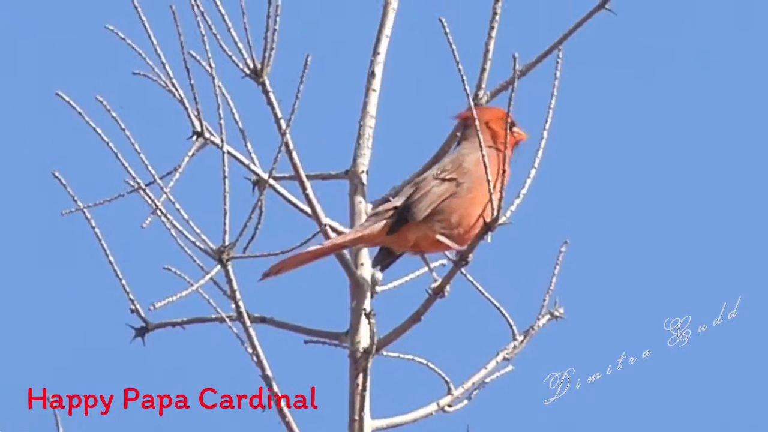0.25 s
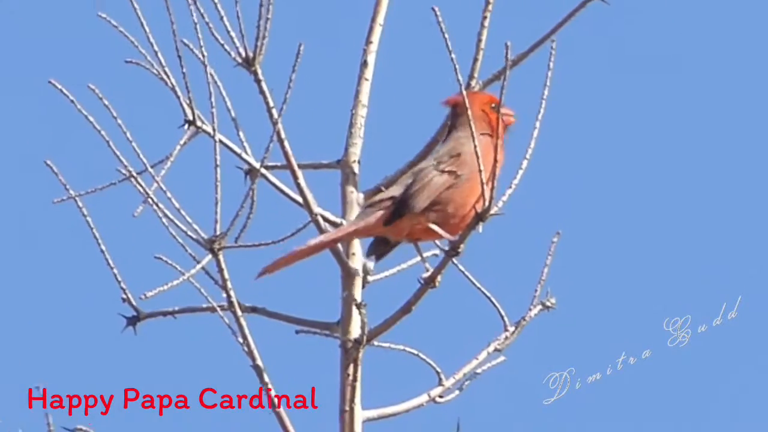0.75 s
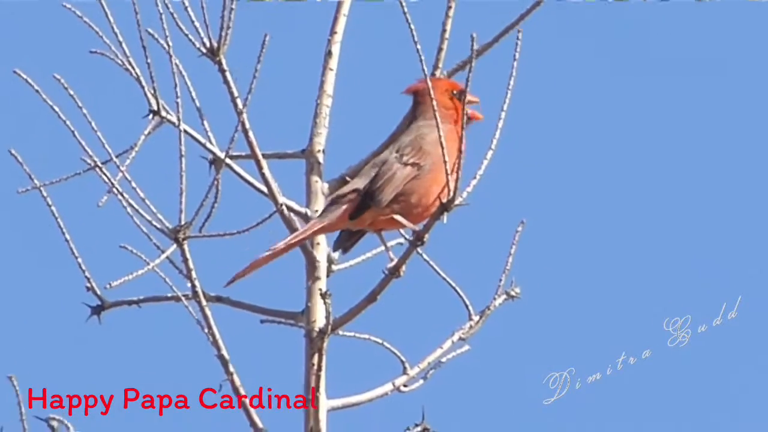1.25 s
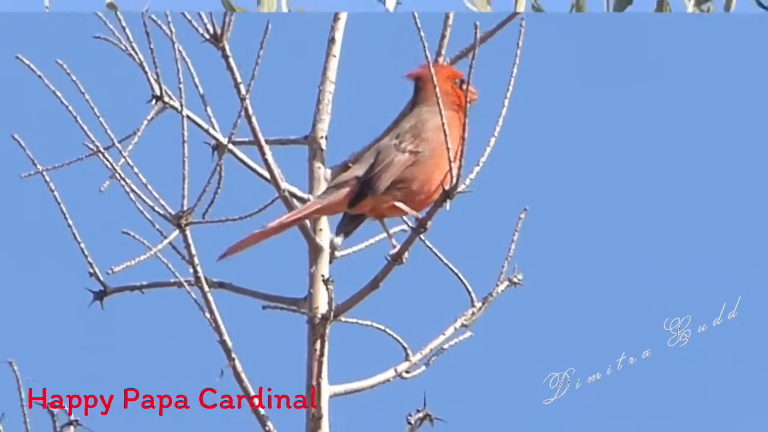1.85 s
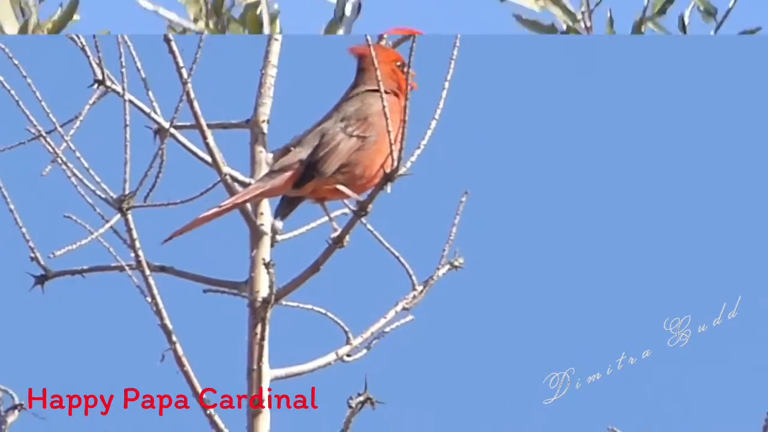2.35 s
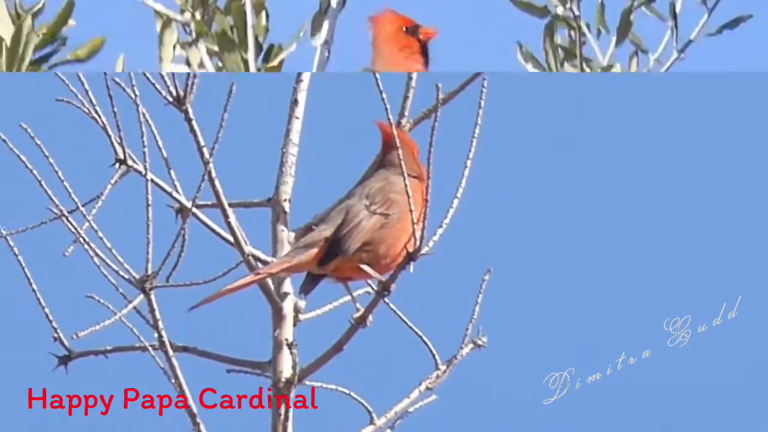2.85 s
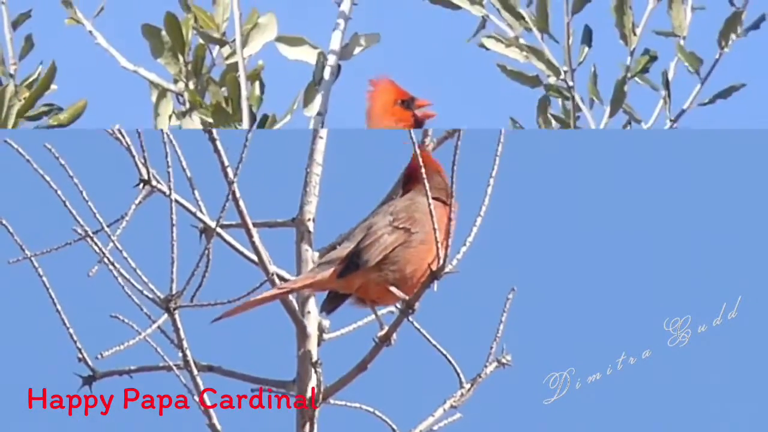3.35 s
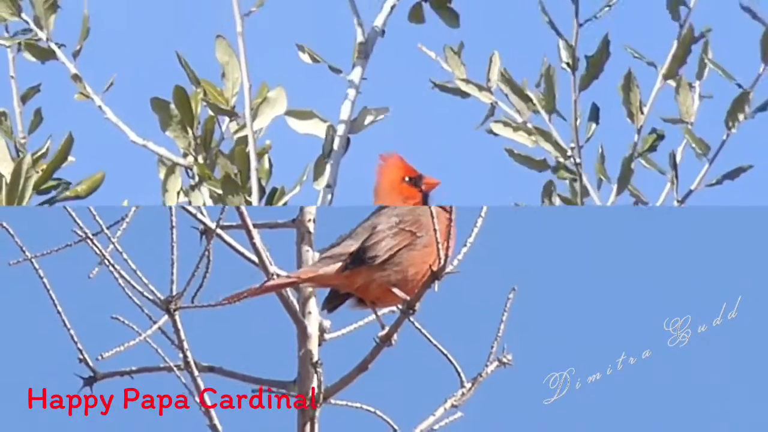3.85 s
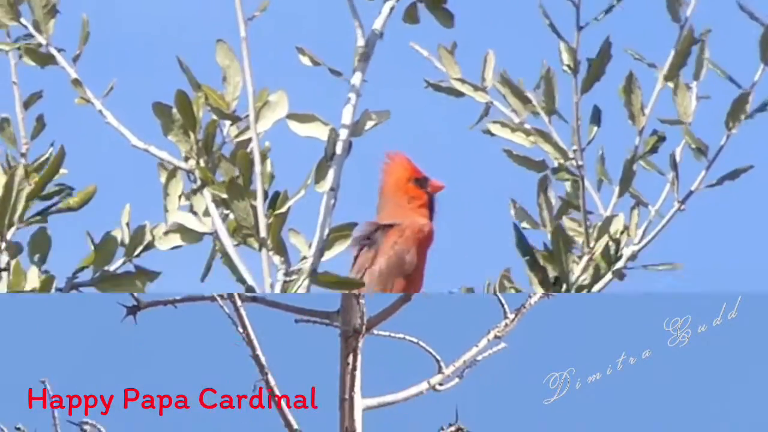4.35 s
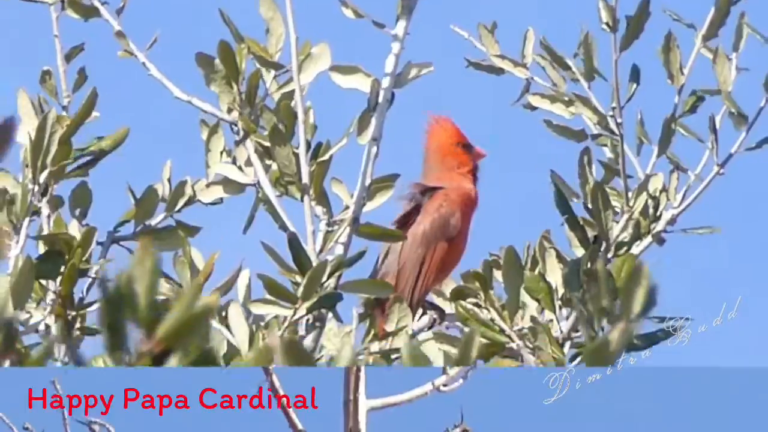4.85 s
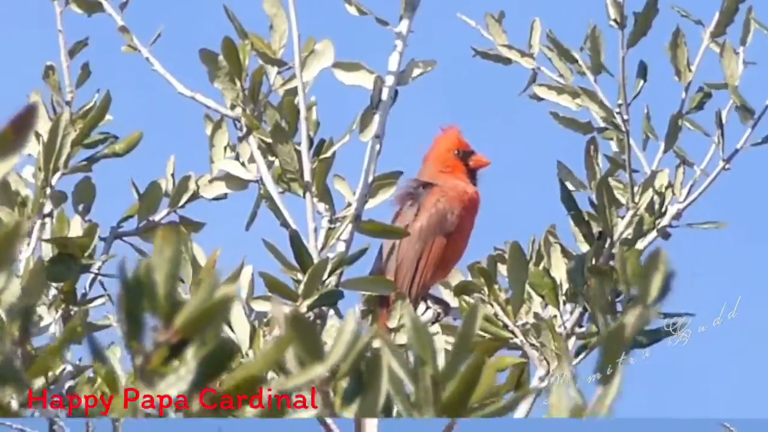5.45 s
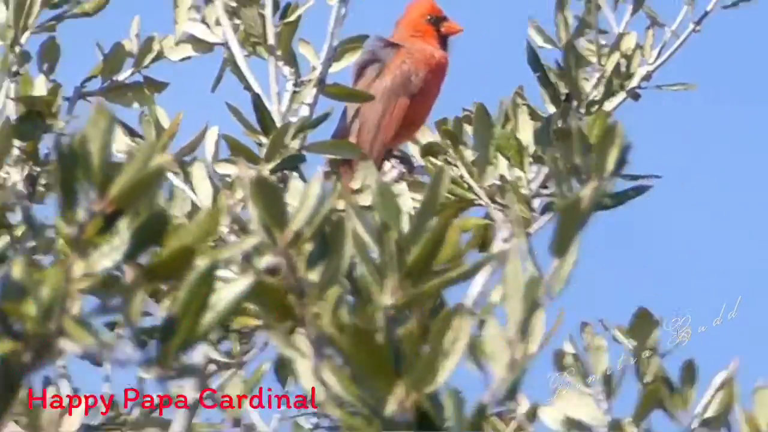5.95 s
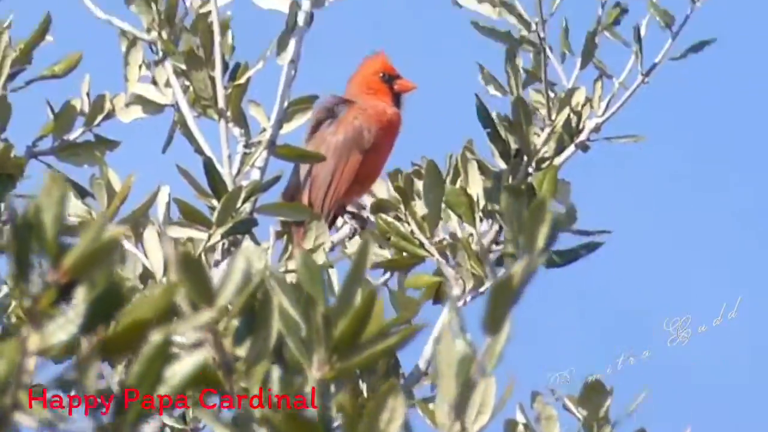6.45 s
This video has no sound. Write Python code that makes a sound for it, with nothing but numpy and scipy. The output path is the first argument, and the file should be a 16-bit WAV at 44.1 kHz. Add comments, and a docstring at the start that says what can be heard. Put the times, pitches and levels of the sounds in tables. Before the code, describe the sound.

Clear falling bird whistles lead into a rapid upward-sweeping trill, overlapped by another cardinal's quick downward slashes, with wind buffeting the microphone.

```python
"""A cardinal trills outdoors: long falling whistles, then a run of rising whips, all nearly pure swept tones.
A second cardinal overlaps it, alternating a soft low note with a quick downward slash as its song sinks from a
high register to a low one. Trees scatter both songs as sprays of echoes. Gusts, made of rumbling noise and single
thumps, buffet the microphone, mostly on the right; behind lie a murmur of coloured noise and a fading drone."""
import sys
import numpy as np
from scipy import signal
from scipy.fft import rfft, irfft
from scipy.io import wavfile
from scipy.ndimage import uniform_filter1d, map_coordinates

SR = 44100
rng = np.random.default_rng(int(sys.argv[2]) if len(sys.argv) > 2 else 0)


def wav_record(signal):
    """Record a signal, one row per channel, as 16-bit PCM in the file named by sys.argv[1]."""
    frames = np.transpose(np.atleast_2d(signal))
    bounded = np.clip(frames, -1, 1)
    # unit amplitude maps onto the largest positive 16-bit level
    quanta = np.round(bounded * 32767).astype(np.int16)
    wavfile.write(sys.argv[1], SR, quanta)


N = 295470
TIME = np.arange(N) / SR

# falling whistles: (start [s], length [s], start pitch [Hz], end pitch [Hz], level [dB])
FALLING_WHISTLES = [(-.13, 0.2, 3910, 2814, -35.5), (0.214, .14, 1967, 1868, -46),
                    (0.419, .112, 8950, 4910, -34), (0.553, .215, 4065, 2814, -31)]
# shape of a falling whistle: (share of its length, share of its fall still to come, level [dB])
FALLING_WHISTLE_SHAPE = [(0, 1, -18), (.055, .93, -2), (.19, .71, -5), (.48, .44, 0.5), (.71, .12, -2.5),
                         (.86, 0.0074, -4), (1, .03, -5.5)]
# onsets of the rising whips: (time [s])
WHIP_ONSETS = [0.845, .956, 1.067, 1.183, 1.297, 1.41, 1.524, 1.638, 1.752, 1.864, 1.974, 2.088, 2.203,
               2.314, 2.431, 2.546, 2.659]
# shape of a rising whip: (share of its length, pitch [Hz], level [dB])
WHIP_SHAPE = [(0, 1880, -23.5), (.14, 2180, -20), (.334, 2784, -8), (.55, 3560, -6.5), (.79, 4330, -5),
              (.9, 4900, -14.5), (1, 5870, -29)]
# syllables of the second song, each a low note and then a slash: (time of the slash [s], level of the slash [dB])
SYLLABLES = [(1.54, -51), (1.74, -47.5), (1.936, -49), (2.135, -45.5), (2.327, -41), (2.521, -45),
             (2.712, -49), (2.897, -44.5), (3.089, -40.5), (3.276, -40), (3.472, -36), (3.68, -36),
             (3.891, -34.5), (4.122, -36.5), (4.354, -35.5), (4.59, -36), (4.823, -36.5)]
# loudness through a low note: (share of its length, level [dB])
LOW_NOTE_SWELL = [(0, -23), (.24, -8), (.46, -10.5), (.64, 2.5), (.85, -1.5), (1, -14)]
# loudness through a slash: (share of its length, level [dB])
SLASH_SWELL = [(0, -9.5), (.14, -8), (.3, -6), (.45, -4.5), (.7, -3), (.85, -8.5), (1, -21)]
# overtones that leak past the throat: (multiple of the pitch, level [dB]);
# the first row stands for the fundamental, whose level is not read
WHISTLE_TONES = [(1, -1), (2, -24.5), (3, -24), (4, -28)]
WHIP_TONES = [(1, 0), (2, -28.5), (3, -34)]
LOW_NOTE_TONES = [(1, 0), (2, -27), (3, -24), (4, -16)]
SLASH_TONES = [(1, 0), (2, -21), (3, -24)]
# how much of the overtones the throat and open beak let out: (frequency [Hz], level [dB])
THROAT = [(3000, -8), (5800, -10), (7400, -3.5), (8500, -1), (10000, -7.5), (11500, -14), (13000, 1),
          (15000, -25)]
# gusts on the microphone: (start [s], length [s], level before it sags [dB])
GUSTS = [(1.183, 0.35, -33), (1.842, 0.25, -29), (2.398, 0.18, -26), (2.744, 0.056, -30.5),
         (3.35, 0.31, -31.5), (4.07, 0.082, -39), (4.32, 0.61, -35.5), (5.338, 0.017, -39),
         (5.446, 0.023, -45)]
# eddies that thump the right port: (time of the middle [s], pitch [Hz], level [dB])
THUMPS = [(1.1697, 169, -21), (1.372, 187, -18), (1.3817, 302, -8.5), (1.4003, 338, -17.5),
          (2.118, 171, -18), (2.399, 300, -15.5), (2.419, 907, -27), (2.4548, 470, -16.5),
          (3.609, 245, -21.5), (4.094, 333, -21.5), (4.152, 290, -21.5), (4.542, 273, -21),
          (4.746, 250, -17.5), (4.767, 344, -20)]
# noise colours, relative within each table: (frequency [Hz], level per Hz [dB])
WIND_COLOUR = [(30, -43), (50, -39), (75, -12.5), (110, -2.5), (160, 0), (240, -1), (350, -12),
               (500, -21.5), (800, -48), (1600, -51), (4000, -66)]
MURMUR_COLOUR = [(30, -34), (55, -22), (90, -4), (140, 1.5), (220, -2), (450, -7), (800, -8), (1750, -18),
                 (2450, -27.5), (3500, -26), (5600, -34.5), (8500, -34.5), (13000, -37), (15000, -44)]
DRONE_COLOUR = [(40, -42), (100, -8.5), (150, -1.5), (195, -7.5), (255, 2), (315, -8), (365, -2),
                (440, -11), (700, -13), (1400, -19.5), (2500, -29.5), (7000, -30.5), (10000, -35.5),
                (15000, -53)]
# likeness of distant sound at the two ports: (frequency [Hz], correlation)
PORT_LIKENESS = [(60, 0.97), (290, 0.99), (640, 0.54), (900, 0.43), (1300, -0.33), (2000, 0.041),
                 (3100, 0.093), (7000, 0.23), (15000, 0.56)]

# First song
STRAIN_HZ, STRAIN_DB_PER_OCTAVE = 5980, 23  # above this pitch the whistling voice weakens
WHIP_LENGTH_S, WHIP_LENGTH_SCATTER = .057, 0.0203  # the scatter is a share of the length
# the trill swells quickly to its peak, then tires slowly
TRILL_PEAK_S, TRILL_DB, TRILL_SWELL_DB_PER_S, TRILL_FADE_DB_PER_S = 1.118, -23, 23.5, 3.5
WHIP_TOP_HZ, WHIP_REACH_HZ_PER_DB = 5930, 180  # weaker whips stop at a lower pitch

# Second song; pairs are (high register, low register) unless noted
SINK_S, SINK_WIDTH_S = 2.77, .42  # the song sinks smoothly from its high register to its low one
LAST_NOTE_S = 4.94  # the song breaks off after one more low note
LOW_NOTE_FOOT_HZ, LOW_NOTE_CREST_HZ = (1808, 1493), (2880, 1830)
LOW_NOTE_CREST_AT = (0.522, .92)  # share of the note's length
LOW_NOTE_LEAD_S = (.127, .116)  # how far the low note starts before its slash
LOW_NOTE_LENGTH_S, LOW_NOTE_CREEP_HZ = .068, 331
LOW_NOTE_ARCH, LOW_NOTE_FLIP_AT = .7, .5  # curvature of the arch; share of the length where the tone flips
# the low notes swell to a peak and fade through the song
LOW_NOTE_PEAK_S, LOW_NOTE_DB, LOW_NOTE_SWELL_DB_PER_S, LOW_NOTE_FADE_DB_PER_S = 2.03, -42.5, 14, 2.5
SLASH_START_HZ, SHOULDER_HZ = 8580, (6950, 4170)
OFF_TUNE_DB_PER_OCTAVE = (-14, 24.5)  # loss at the onset; a negative loss is a boost
SLASH_DROP_S = (.0046, .003)  # time constant of the drop onto the shoulder
SLASH_BRIGHT_DB = (10, -5)  # lift of the overtones
# early slashes only sag from the shoulder; around SLIDE_FROM_S they turn to sliding all the way down
SLIDE_FROM_S, SLIDE_WIDTH_S, SLASH_SAG_HZ, SLASH_END_HZ = 2.78, .045, 402, 2185
SLASH_LENGTH_S = (.035, .048)  # (sagging, sliding)

# Wind, murmur and recorder
GUST_ATTACK_S, GUST_RELEASE_S, GUST_SAG_DB_PER_S = 0.033, .055, 11  # attack and release are time constants
BREEZE_S, BREEZE_LENGTH_S, BREEZE_DB, BREEZE_SAG_DB_PER_S = 1.17, 3.75, -37.5, 2.2  # lighter wind between gusts
GUST_HISS_DB = 9.5  # fine turbulence, which grows with the square of the wind's force
MURMUR_DB, MURMUR_RISE_DB_PER_S, MURMUR_STEADY_S = -49, 0.95, 5.37  # the murmur grows, then holds
DRONE_DB, DRONE_FADES_S, DRONE_FADE_DB_PER_S = -43.5, 2.13, 5.5  # the drone holds, then recedes
TOP_HZ = 15200


def trilling_bird():
    """Long slurred whistles, then the same rising whip about nine times a second."""
    lead = .2  # seconds of run-up: the first whistle is already under way and echoing at the start
    song = np.zeros(N)
    for start, length, start_hz, end_hz, loud_db in FALLING_WHISTLES:
        height, shape_db = curves(FALLING_WHISTLE_SHAPE, progress(length))
        hz = blend((end_hz, start_hz), height)
        whistle_db = shape_db + loud_db - strain(hz)
        add(song, lead + start, syrinx(hz, whistle_db, WHISTLE_TONES, waver=0.0031, flutter_db=1.34))
    for start, chance in zip(WHIP_ONSETS, rng.standard_normal(len(WHIP_ONSETS))):
        length = WHIP_LENGTH_S * (1 + WHIP_LENGTH_SCATTER * chance)
        hz, shape_db = curves(WHIP_SHAPE, progress(length))
        effort_db = swell(start - TRILL_PEAK_S, TRILL_SWELL_DB_PER_S, TRILL_FADE_DB_PER_S)
        top_hz = WHIP_TOP_HZ + WHIP_REACH_HZ_PER_DB * effort_db
        whip_db = shape_db + TRILL_DB + effort_db
        add(song, lead + start, syrinx(np.minimum(hz, top_hz), whip_db, WHIP_TONES, waver=0.018, flutter_db=0.34))
    direct = arrival(song, bounce_s=.00475, bounce=.4)
    echoes = trees(song, wet_db=-6.5, t60=1.0, early_db=3.0, echo_s=0.0798, echo_db=3, spread=1.0, bough_db=22.5)
    heard = pan(-4.5) * direct + pan(-1.8) * echoes
    skip = int(lead * SR)
    return np.pad(heard[:, skip:], ((0, 0), (0, skip)))


def slashing_bird():
    """Low notes and slashes alternate; both follow one sinking register."""
    song = np.zeros(N)
    note_starts = [start - blend(LOW_NOTE_LEAD_S, register(start)) for start, _ in SYLLABLES]
    for start in note_starts + [LAST_NOTE_S]:
        add(song, start, low_note(start))
    for start, loud_db in SYLLABLES:
        add(song, start, slash(start, loud_db))
    direct = arrival(song, bounce_s=.00425, bounce=.3)
    echoes = trees(song, wet_db=-4.0, t60=1.4, early_db=9, echo_s=0.048, echo_db=-7, spread=0.66, bough_db=16)
    return pan(0.18) * (direct + echoes)


def low_note(start):
    """A faint tone creeps upward, then flips to a brighter arch."""
    sunk = register(start)
    u = progress(LOW_NOTE_LENGTH_S)
    foot = blend(LOW_NOTE_FOOT_HZ, sunk) + LOW_NOTE_CREEP_HZ * u
    from_crest = u - blend(LOW_NOTE_CREST_AT, sunk)
    arch = blend(LOW_NOTE_CREST_HZ, sunk) * (1 - LOW_NOTE_ARCH * from_crest ** 2)
    hz = blend((foot, arch), step(u, LOW_NOTE_FLIP_AT, .045))
    song_db = LOW_NOTE_DB + swell(start - LOW_NOTE_PEAK_S, LOW_NOTE_SWELL_DB_PER_S, LOW_NOTE_FADE_DB_PER_S)
    note_db = curves(LOW_NOTE_SWELL, u)[0] + song_db
    return syrinx(hz, note_db, LOW_NOTE_TONES, waver=0.0058, flutter_db=1.5)


def slash(start, loud_db):
    """The pitch drops onto a shoulder and slides off it."""
    sunk = register(start)
    shoulder_hz = blend(SHOULDER_HZ, sunk)
    sliding = step(start, SLIDE_FROM_S, SLIDE_WIDTH_S)
    length = blend(SLASH_LENGTH_S, sliding)
    u = progress(length)
    drop = (SLASH_START_HZ - shoulder_hz) * np.exp(-u * length / blend(SLASH_DROP_S, sunk))
    slide_depth = blend((SLASH_SAG_HZ, shoulder_hz - SLASH_END_HZ), sliding)
    slide = slide_depth * np.sin(np.pi / 2 * u ** 1.7) ** 2
    # the high onset is strong at first and weakens as the throat is tuned lower
    off_tune_db = blend(OFF_TUNE_DB_PER_OCTAVE, sunk) * np.log2(1 + drop / shoulder_hz)
    slash_db = curves(SLASH_SWELL, u)[0] + loud_db - off_tune_db
    tones = [(k, tone_db + blend(SLASH_BRIGHT_DB, sunk)) for k, tone_db in SLASH_TONES]
    return syrinx(shoulder_hz + drop - slide, slash_db, tones, waver=.012, flutter_db=3.5)


def register(at):
    """How far the second song has sunk: 0 in its high register, 1 in its low one."""
    return step(at, SINK_S, SINK_WIDTH_S)


def syrinx(hz, db, tones, waver, flutter_db):
    """A nearly pure, trembling tone; faint overtones flare as they cross the throat's resonances."""
    pitch_tremble, level_tremble, overtone_tremble = [tremble(len(hz)) for _ in range(3)]
    wavering_hz = uniform_filter1d(hz, size=90) * (1 + waver * pitch_tremble)
    phase = 2 * np.pi * np.cumsum(wavering_hz) / SR
    overtones = np.zeros(len(hz))
    for k, tone_db in tones[1:]:
        gain = undb(tone_db + colour(THROAT, k * hz))
        overtones += gain * np.sin(round(k) * phase) * (k * hz < SR / 2)  # silent where it would alias
    tone = np.sin(phase) + overtones * undb(3.4 * overtone_tremble)
    soft_ends = signal.windows.tukey(len(hz), min(150 / len(hz), 1))
    return tone * undb(db + flutter_db * level_tremble) * soft_ends


def tremble(length):
    """Smoothed chance of unit rms, for the unsteadiness within a note."""
    chance = rng.standard_normal(length)
    return unit(uniform_filter1d(uniform_filter1d(chance, size=90), size=90))


def strain(hz):
    """Decibels that the voice loses at the top of its range."""
    return STRAIN_DB_PER_OCTAVE * np.log2(np.maximum(hz / STRAIN_HZ, 1))


def arrival(song, bounce_s, bounce):
    """Direct sound plus its ground bounce, which ripples every sweep; the left port hears it slightly later."""
    both = song + bounce * delayed(song, bounce_s)
    return np.array([delayed(both, 2.1e-5), both])


def trees(song, wet_db, t60, early_db, echo_s, echo_db, spread, bough_db):
    """Twigs and leaves spray echoes, boughs add distinct ones, a thicket a cluster, trees beyond a thin tail."""
    t = np.arange(SR) / SR
    paths = rng.standard_normal((3, SR))  # one shared by both channels, then one for each
    boughs = np.sign(paths[0]) * (rng.random(SR) < 130 / SR)  # about 130 a second
    scatter = unit(paths[0] + undb(bough_db) * boughs + spread * paths[1:])
    tail = undb(-60 * t / t60)
    twigs = undb(early_db - 60 * t / .24)
    thicket = undb(echo_db) * np.exp(-((t - echo_s) / 0.005) ** 2)
    build_up = np.minimum(t / .012, 1)
    response = scatter * (tail + twigs + thicket) * build_up
    response = response / np.sqrt(np.sum(response ** 2) / 2)  # unit energy per channel on average
    dulled = band(response, 13700, "low")
    return undb(wet_db) * signal.fftconvolve(song[None], dulled, axes=1)[:, :N]


def wind():
    """Turbulence rumbles on the microphone ports; single eddies give a suck and a push."""
    breeze = gust(BREEZE_S, BREEZE_LENGTH_S, BREEZE_DB, BREEZE_SAG_DB_PER_S)
    gust_power = sum(gust(start, length, loud_db, GUST_SAG_DB_PER_S) ** 2 for start, length, loud_db in GUSTS)
    force = np.sqrt(breeze ** 2 + gust_power)
    hiss = unit(band(noise(WIND_COLOUR), 490, "high")) * force * undb(GUST_HISS_DB)
    right = (noise(WIND_COLOUR) + hiss) * force * undb(1.54 * walk(45))
    for middle, hz, loud_db in THUMPS:
        add(right, middle - 2 / hz, undb(loud_db) * thump(hz))
    # the left port is sheltered, so its rumble is weaker and duller
    left_rumble = band(noise(WIND_COLOUR), 307, "low") * force * undb(-7.5 + 2 * walk(29.67))
    left = undb(-14) * right + left_rumble
    return np.array([left, right])


def gust(start, length, loud_db, sag_db_per_s):
    """Strength of one push of wind: it builds quickly, sags while it lasts and dies away."""
    age = TIME - start
    edges = np.exp(np.minimum(age, 0) / GUST_ATTACK_S - np.maximum(age - length, 0) / GUST_RELEASE_S)
    return edges * undb(loud_db - sag_db_per_s * np.clip(age, 0, length))


def thump(hz):
    """One eddy: a brief swing of pressure that breaks up into finer turbulence."""
    cycles = np.arange(-2, 2, hz / SR)
    swing = np.sin(2 * np.pi * cycles) * np.exp(-(cycles / 0.62) ** 2)
    grain = band(band(rng.standard_normal(len(cycles)), 450, "low"), 190, "high")
    fine = unit(grain) * np.exp(-cycles ** 2)
    return swing + undb(-24) * fine


def murmur():
    """Far-off outdoor hum and hiss; a drone like distant traffic lies over it and fades away."""
    murmur_db = MURMUR_DB - MURMUR_RISE_DB_PER_S * np.maximum(MURMUR_STEADY_S - TIME, 0)
    drone_db = DRONE_DB - DRONE_FADE_DB_PER_S * np.maximum(TIME - DRONE_FADES_S, 0)
    far = pan(0.92) * diffuse(MURMUR_COLOUR) * undb(murmur_db + 0.11 * walk(9.5))
    drone = pan(1.4) * diffuse(DRONE_COLOUR) * undb(drone_db + 1.85 * walk(6.89))
    return far + drone


def diffuse(spectrum):
    """Noise from all around: the two ports agree in the bass and differ higher up."""
    likeness = np.clip(colour(PORT_LIKENESS, np.fft.rfftfreq(N, 1 / SR)), -.99, .99)
    mid = irfft(rfft(noise(spectrum)) * np.sqrt(1 + likeness), N)
    side = irfft(rfft(noise(spectrum)) * np.sqrt(1 - likeness), N)
    return unit(np.array([mid + side, mid - side]))


def noise(spectrum):
    """Noise of unit rms with the given colour."""
    gains = undb(colour(spectrum, np.fft.rfftfreq(N, 1 / SR)))
    return unit(irfft(rfft(rng.standard_normal(N)) * gains, N))


def colour(spectrum, hz):
    """A spectrum read on a logarithmic frequency axis."""
    points, values = np.transpose(spectrum)
    return np.interp(np.log(np.maximum(hz, 1)), np.log(points), values)


def walk(rate):
    """Slow chance with a spread near 1, drawn afresh about rate times a second and smoothed."""
    k = max(int(SR / rate), 1)
    steps = np.repeat(rng.standard_normal(N // k + 1), k)
    return 1.24 * uniform_filter1d(uniform_filter1d(steps, k), k)[:N]


def band(x, hz, kind):
    """Gentle low-pass or high-pass."""
    return signal.sosfilt(signal.butter(2, min(hz, .45 * SR), kind, fs=SR, output="sos"), x)


def delayed(x, seconds):
    """The same sound a little later, to a fraction of a sample."""
    return map_coordinates(x, [np.arange(N) - seconds * SR], order=3)


def add(track, start, sound):
    """Mix a sound into a track at its time."""
    i = max(int(start * SR), 0)
    track[i:i + len(sound)] += sound[:N - i]


def pan(left_db):
    """Gains of the two channels for a left-minus-right level."""
    return undb(np.array([[left_db], [-left_db]]) / 2)


def progress(length):
    """Runs from 0 to 1 over a note."""
    return np.linspace(0, 1, int(length * SR))


def curves(rows, at):
    """Each column of a table after the first, joined by straight lines."""
    key, *columns = np.transpose(rows)
    return [np.interp(at, key, c) for c in columns]


def step(at, centre, width):
    """A smooth change from 0 to 1."""
    return (1 + np.tanh((at - centre) / width / 2)) / 2


def blend(pair, share):
    """Go from the first value of a pair to the second."""
    return pair[0] + (pair[1] - pair[0]) * share


def swell(since_peak, rise, fall):
    """Decibels relative to a peak that is approached and left at steady rates."""
    return np.minimum(rise * since_peak, -fall * since_peak)


def undb(db):
    """Decibels to gain."""
    return 10 ** (np.asarray(db) / 20)


def unit(x):
    """Scale to an rms of 1."""
    return x / np.sqrt(np.mean(x ** 2))


def scene():
    """Both songs over the murmur, with wind at the microphone."""
    return trilling_bird() + slashing_bird() + wind() + murmur()


def record(dry):
    """The recorder steeply cuts everything above its top frequency."""
    return signal.sosfilt(signal.ellip(10, .1, 80, TOP_HZ, fs=SR, output="sos"), dry)


dry = scene()
out = record(dry)
wav_record(out)
```